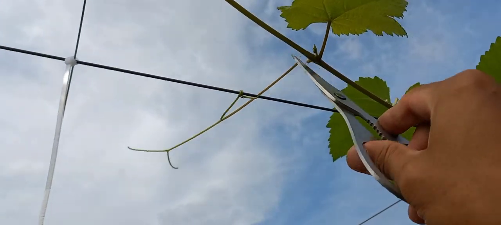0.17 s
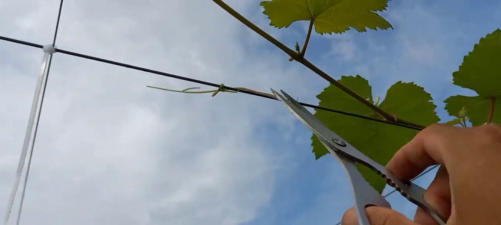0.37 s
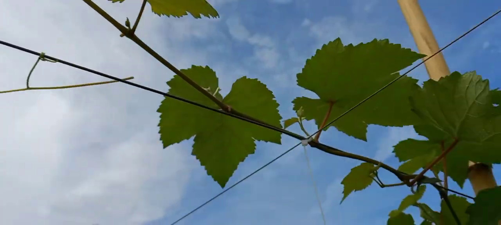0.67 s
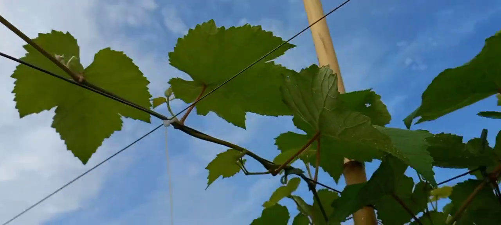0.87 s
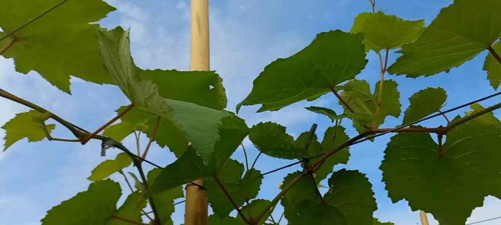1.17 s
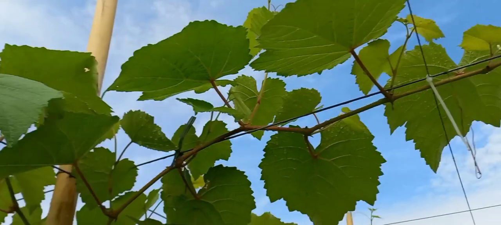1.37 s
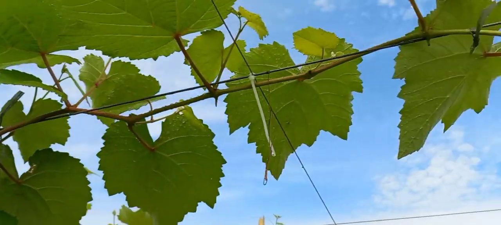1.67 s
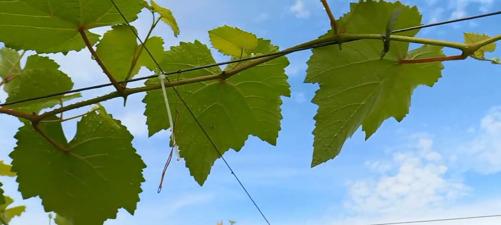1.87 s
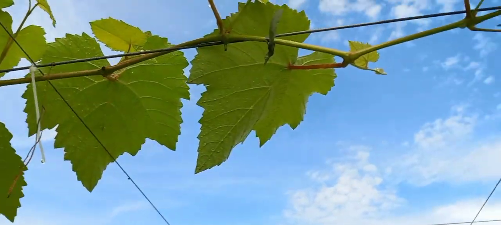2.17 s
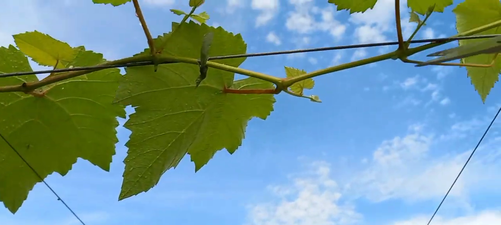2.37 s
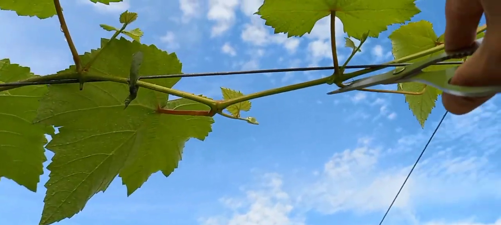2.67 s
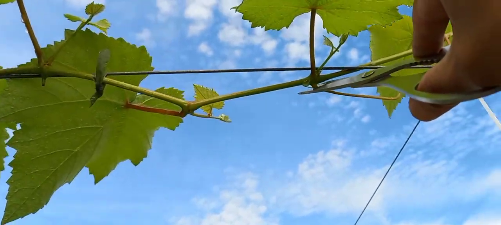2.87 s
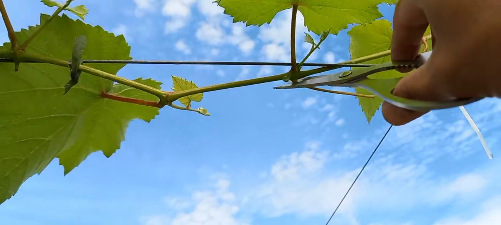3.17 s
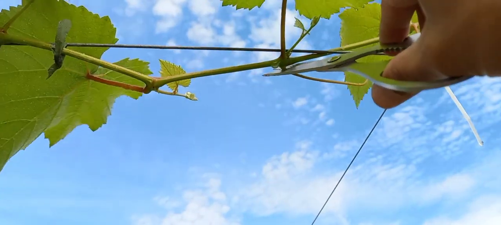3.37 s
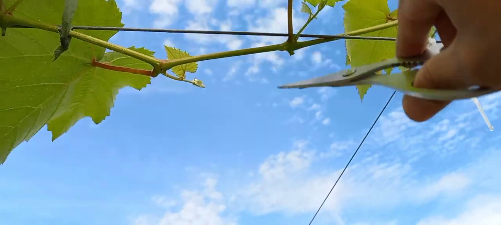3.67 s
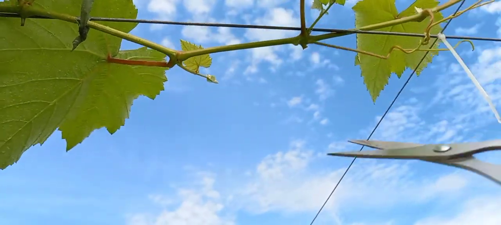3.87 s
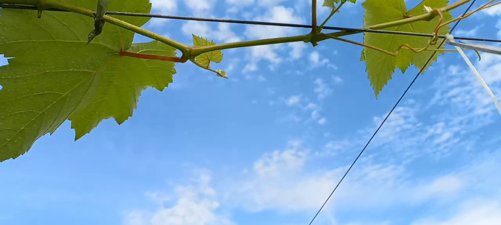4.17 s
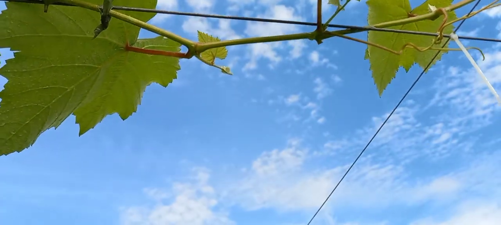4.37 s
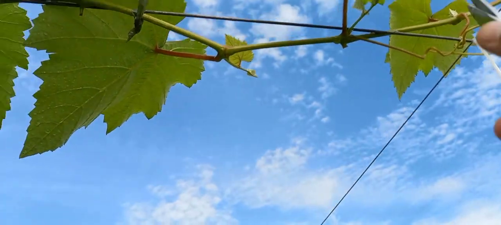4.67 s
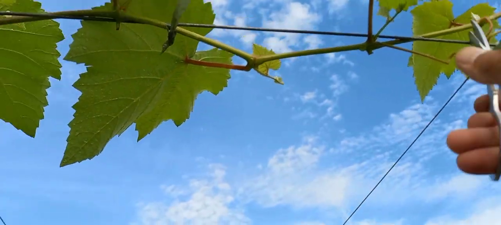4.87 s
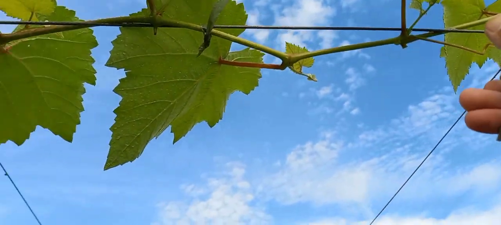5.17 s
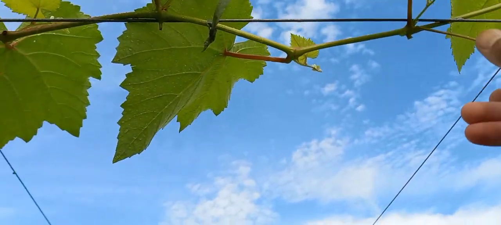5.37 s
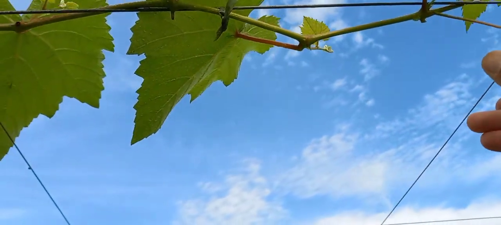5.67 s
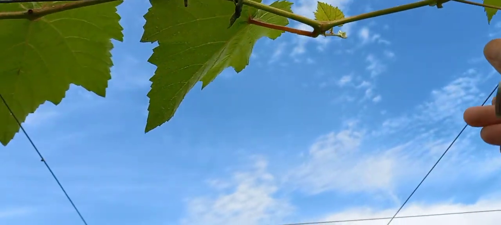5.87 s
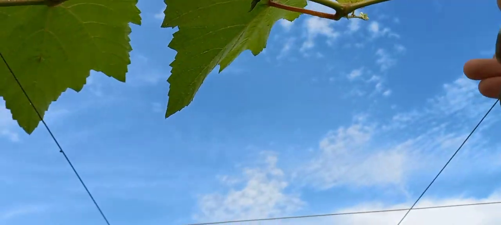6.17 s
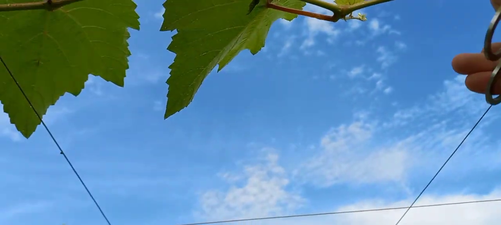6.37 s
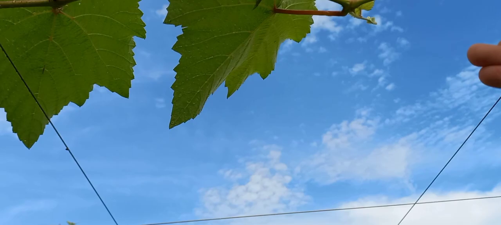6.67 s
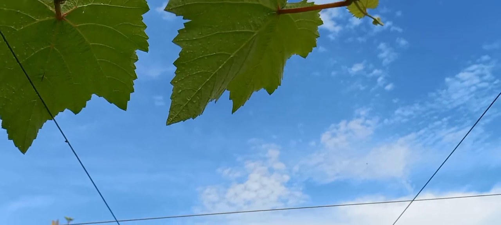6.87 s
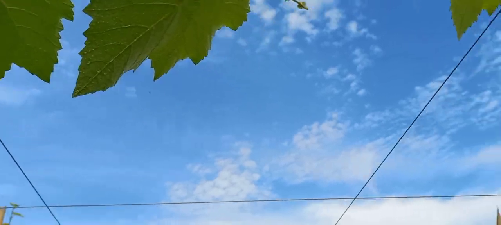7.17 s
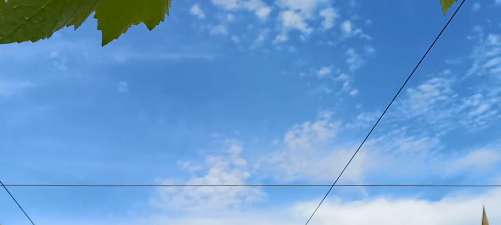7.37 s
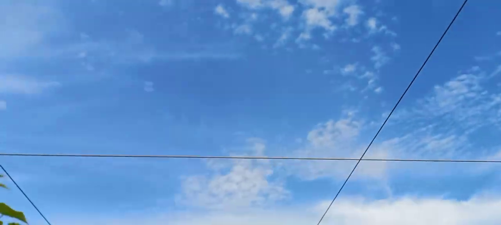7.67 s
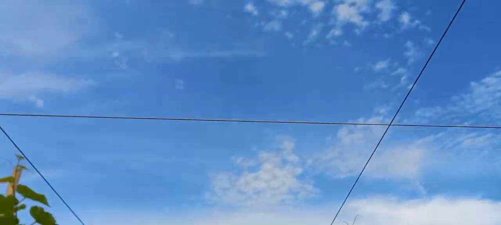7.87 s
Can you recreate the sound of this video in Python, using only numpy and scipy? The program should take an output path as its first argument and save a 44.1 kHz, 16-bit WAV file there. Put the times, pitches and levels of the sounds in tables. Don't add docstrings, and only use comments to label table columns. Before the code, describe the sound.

Small steel pruning shears scrape, snap and crack through vine stems outdoors, over a low machinery throb, rustling leaves, hissing insects and bird chirps.

```python
import sys
import numpy as np
from scipy import signal
from scipy.fft import rfft, irfft, next_fast_len
from scipy.io import wavfile
from scipy.ndimage import uniform_filter1d, map_coordinates

SR = 44100
rng = np.random.default_rng(int(sys.argv[2]) if len(sys.argv) > 2 else 0)


def pcm_store(signal):
    levels = np.round(np.clip(np.atleast_2d(signal), -1, 1) * 32767)
    wavfile.write(sys.argv[1], SR, levels.astype(np.int16).T)


def voltage_ratio(level):
    return 10 ** (np.asarray(level, float) / 20)


N = 353461
SPAN = 8192
TOP_HZ = 15600
MEAN_LOAD_DB, STILL_DB = -60, -85

# time in seconds, level in dB.
MACHINE_LOAD = [(0, -56.5), (.5, -60), (1.3, -58.5), (1.5, -64.5), (2.35, -61), (3.0, -62), (3.25, -55),
                (5.1, -58.5), (5.42, -54.5), (5.6, -57.5), (6.1, -55), (6.6, -58), (8.01, -61)]
# time in seconds, rustle level in dB.
LEAF_STIR = [(0, -86), (.31, -78.5), (.47, -88), (.8, -79.5), (1.45, -82), (1.72, -87.5), (3.5, -86),
             (3.68, -79), (3.86, -88), (4.33, -78), (4.62, -87.5), (4.95, -82), (5.47, -89), (6.49, -85),
             (6.82, -81.5), (7.23, -75), (7.85, -80), (8.01, -72)]
# frequency in Hz, width in Hz, level in dB.
BLADE_RING = [(2220, 300, -27), (3471, 68, -33.5), (3970, 100, -35.5), (4420, 110, -24.5),
              (5530, 100, -17.5), (6860, 360, -14), (7540, 210, -11.5), (8800, 96, -35), (8720, 130, -9.5),
              (9810, 170, -8.5), (11300, 400, 2.5), (12660, 8300, -14), (12200, 120, -4.5),
              (13900, 1300, -2)]
# frequency in Hz, width in Hz, level in dB.
TIP_RING = [(15400, 220, -11)]


def unit(x):
    return x / np.sqrt(np.mean(x ** 2) + 1e-20)


def top(x):
    return x / np.abs(x).max()


def along(points, hz):
    f, v = np.transpose(points)
    return np.interp(np.log(hz + 1), np.log(f + 1), v)


def curves(rows, t):
    s, *cols = np.transpose(rows)
    return [np.interp(t, s, c) for c in cols]


def bumps(rows, width_s, t):
    return sum(db * np.exp(-((t - s) / width_s) ** 2) for s, db in rows)


def wobble(rate):
    knots = rng.standard_normal(int(N * rate / SR) + 4)
    return map_coordinates(knots, [np.arange(N) * rate / SR])


def filtered(x, response):
    m = next_fast_len(x.shape[-1] + SR // 4)
    spectrum = rfft(x, m) * response(np.fft.rfftfreq(m, 1 / SR))
    return irfft(spectrum, m)[..., :x.shape[-1]]


def modes(peaks, lo_hz=0, hi_hz=99999, widen=1, scatter_db=0):
    luck = rng.standard_normal(len(peaks))

    def response(f):
        total = 0
        for k, (centre, width, db) in enumerate(peaks):
            gain = (-1) ** k * voltage_ratio(db + scatter_db * luck[k]) * (lo_hz <= centre < hi_hz)
            damping = 1j * f * width * widen
            total = total + gain * damping / (centre * centre - f * f + damping)
        return total
    return response


def rush(response, patchy_db):
    # frequency in Hz, likeness from -1 to 1.
    likeness = [(60, 1), (180, 0.85), (550, 0.28), (1650, 0.066), (4970, 0.51), (15000, -0.25)]
    z = signal.stft(rng.standard_normal((2, N)), nperseg=512)[2]
    patches = uniform_filter1d(rng.standard_normal(z.shape[1:]), size=6, axis=0)
    patches = uniform_filter1d(patches, size=14, axis=1)
    pair = signal.istft(z * voltage_ratio(patchy_db * unit(patches)), nperseg=512)[1][:, :N]

    def mid_side(hz):
        angle = np.arccos(np.clip(along(likeness, hz), -1, 1)) / 2
        return response(hz) * [np.cos(angle), np.sin(angle)]
    mid, side = filtered(pair, mid_side)
    pair = np.array([mid + side, mid - side])
    return pair / np.std(pair.mean(axis=0))


def far(x, t60, wet_db):
    t = np.arange(SR // 2) / SR
    tail = rng.standard_normal((2, len(t))) * voltage_ratio(-60 * t / t60)
    tail = tail / np.linalg.norm(tail[0])
    return x + voltage_ratio(wet_db) * signal.fftconvolve(x[None], tail, axes=1)[:, :N]


def rumble(t):
    # frequency in Hz, level in dB per Hz.
    throb = [(13, -97.5), (22, -70.5), (37, -27), (76, -4), (92, 2), (109, -1.5), (211, -21.5), (242, -35),
             (260, -44), (340, -62), (570, -120)]
    # time in
    # seconds, change in dB.
    surges = [(.09, -12), (.18, 10), (.33, 9), (0.579, 7.5), (1.43, -5), (1.521, -4), (1.67, 7), (1.83, -3),
              (1.91, 7.5), (2.07, 7), (2.26, 4.5), (2.9, -6.5), (3.52, -10), (3.82, 7.5), (3.96, 2),
              (4.25, 5.5), (4.4, 4), (4.9, -8.5), (4.98, 5.5), (5.38, 3.5), (5.678, -6), (6.16, -10),
              (6.359, -16), (6.49, 4.5), (6.759, 9), (7.02, -5), (7.08, 10), (7.94, 6.5)]
    drone = rush(lambda hz: voltage_ratio(along(throb, hz)), patchy_db=0.0)
    drone /= np.abs(uniform_filter1d(drone.mean(axis=0) ** 2, size=3000)) ** 0.29 + 0.069
    return voltage_ratio(curves(MACHINE_LOAD, t)[0] + bumps(surges, 0.04, t)) * drone


def hum(t, stir_db):
    # frequency in Hz, level in dB per Hz.
    hum_tone = [(120, -22), (200, -5.5), (374, -12), (402, -14.5), (542, -14), (616, -15.5), (1310, -21),
                (1550, -23), (1840, -23.5), (6000, -42), (7800, -56), (13200, -120)]
    # time in seconds, swell in dB.
    breeze = [
        (2.37, 1.4),
        (4.85, 4.8),
        (5.42, 4),
        (5.85, 1.5),
        (6.3, 1.3),
    ]
    load_db = curves(MACHINE_LOAD, t)[0] - MEAN_LOAD_DB
    level_db = -74 + 0.27 * load_db + 0.26 * stir_db + bumps(breeze, 0.057, t)
    return voltage_ratio(level_db) * rush(lambda hz: voltage_ratio(along(hum_tone, hz)), patchy_db=1.6)


def rustle(t):
    # frequency in Hz, level in dB per Hz.
    leaf_tone = [(1760, -28.5), (3000, -12), (3260, -11.5), (3580, -11.5), (4430, -11.5), (6110, -13),
                 (7660, -3.5), (9090, -11.5), (15400, -6.5)]
    noise = rush(lambda hz: voltage_ratio(along(leaf_tone, hz)) * (hz < TOP_HZ), patchy_db=1.2)
    return voltage_ratio(curves(LEAF_STIR, t)[0] + 4.0) * noise


def insects(t, stir_db):
    # frequency in Hz, width in Hz, level in dB.
    wings = [(6770, 1600, -4), (7820, 540, 0.5)]
    # start in seconds, end in seconds, level in dB.
    near_buzz = [
        (2.73, 2.89, -82),
        (4.93, 5.08, -84),
    ]
    pulse = 2 * np.sin(np.pi * 190 * t) ** 2
    buzz = sum(voltage_ratio(db) * (t > start) * (t < end) for start, end, db in near_buzz) * pulse
    drift_db = 0.59 * wobble(74) + 1.5 * np.sin(2.3 * t) * np.sin(6.5 * t + 1)
    chorus = voltage_ratio(-86.5 - 0.69 * stir_db + drift_db)
    return (chorus + buzz) * rush(lambda hz: modes(wings)(hz) ** 2, patchy_db=1.5)


def swish(t):
    # time in seconds, level in dB.
    drag = [(0.17, -72.5), (0.196, -61.5), (0.232, -66), (0.234, -65.5), (0.38, -60.5), (0.46, -71.5),
            (.58, -88)]
    # frequency in Hz, level in dB per Hz.
    shoot_tone = [(180, -21), (300, -5), (689, -1), (978, -3), (1190, 3.5), (1280, -10), (3190, -32),
                  (3520, -30), (4440, -15), (10000, -19), (13500, -6), (16000, -25.5)]
    moving = (t > drag[0][0]) * (t < drag[-1][0])
    return voltage_ratio(curves(drag, t)[0]) * moving * rush(lambda hz: voltage_ratio(along(shoot_tone, hz)), patchy_db=5.0)


def field():
    t = np.arange(N) / SR
    stir_db = curves(LEAF_STIR, t)[0] - STILL_DB

    def from_right(hz):
        later_s = 0.00045
        return voltage_ratio([[-.9], [.9]]) * np.exp(-1j * np.pi * hz * later_s * np.array([[1], [-1]]))
    machinery = filtered(rumble(t) + hum(t, stir_db), from_right)
    return machinery + rustle(t) + swish(t) + insects(t, stir_db)


def hoots():
    # start in seconds, length in seconds, pitch in Hz, level in dB.
    calls = [
        (0, 0.34, 933, -76.5),
        (1.502, 0.4, 1582, -82.5),
        (2.0, 0.21, 1577, -87.5),
        (2.405, 0.36, 1123, -83.5),
        (3.599, 1.68, 1031, -88),
        (4.201, 1.15, 1092, -85),
        (6.285, 0.17, 1890, -80.5),
    ]
    t = np.arange(N) / SR
    notes = 0
    for s, length, hz, db in calls:
        level = voltage_ratio(db + 1.5 * wobble(7))
        swell = np.clip(np.minimum(t - s + .02, s + length - t) / .09, 0, 1)
        notes = notes + level * swell * np.sin(2 * np.pi * hz * t + .95 * wobble(22))
    return far(1.2 * notes, t60=0.16, wet_db=-9)


def add(out, s, sound, pan_db):
    # frequency in Hz, share of
    # the left-right dB.
    shade = [(300, 3.74), (2400, 1.2), (8000, 0.77), (12000, 1.5), (15000, 1.3)]
    # time in seconds, distance in cm.
    extra_way = [(.2, 1.2), (.62, 7), (.7, 7), (.9, 13), (1.1, 15.5), (1.4, 15), (2.6, 1), (4.9, 1),
                 (6.48, 6), (7.0, 11.5), (7.2, 10), (7.6, 8.5)]
    # delay in ms, gain.
    bends = [(.11, -.7), (.27, .65), (.52, .55), (.9, -.4), (1.4, .3)]
    bend_hz = 2500

    def ports(hz):
        ratio = voltage_ratio(pan_db * along(shade, hz))
        spread = (1 + s % .1 * 5) / 1000
        bent = sum(g * np.exp(-2j * np.pi * hz * ms * spread) for ms, g in bends)
        paths = 1 + 1j * hz / (bend_hz + 1j * hz) * bent
        delay = np.exp(-2j * np.pi * hz * curves(extra_way, s)[0] / 34300)
        late = delay * paths / np.sqrt(1 + 1.5 * hz ** 2 / (bend_hz ** 2 + hz ** 2))
        return 2 / np.sqrt(1 + ratio ** 2) * np.array([ratio * late, ratio ** 0])
    start = round(s * SR)
    out[:, start:start + SPAN] += filtered(sound, ports)


def blows(events, peaks, blow_s, widen, woody, woody_hz, grain, fuzz, tail_db, tail_s, thud_db, thud_grows,
          broad=.88, middle_tail=1):
    out, t = np.zeros((2, N + SPAN)), np.arange(SPAN) / SR
    push = np.minimum(t / 0.0009, 1) * np.exp(-(t / blow_s) ** 2 / 2)
    thud = top(filtered(push, modes([(200.3, 160, 0.5), (696, 1400, -5.5)])))
    contact = t == 0
    seat = 0.5 * np.exp(-((t - .0008) * SR) ** 2)
    for s, db, pan_db, middle_db, knock_db in events:
        crack = rfft(rng.standard_normal((3, SPAN)) * push)
        crack = irfft(crack / uniform_filter1d(np.abs(crack), size=60))
        tail = rng.standard_normal((3, SPAN)) * voltage_ratio(tail_db - 60 * t / tail_s) * np.minimum(t / blow_s, 1)
        burst = top(top(crack * np.exp(-t / .004)) + 0.75 * contact + seat)
        burst = burst + tail * [[1], [middle_tail], [middle_tail]]
        high = top(filtered(burst[0], modes(peaks, 10500, widen=widen, scatter_db=2)))
        middle = top(filtered(burst[1], modes(peaks, 3000, 10500, widen=widen, scatter_db=2)))
        clack = filtered(2 * contact + burst[2] + fuzz * tail[0], modes([(5160, 67000, 0)]))
        middle = middle + broad * top(clack)

        def body(hz):
            return modes(woody)(hz) * (1j * hz / (woody_hz + 1j * hz)) ** 3
        knock = top(filtered(contact + grain * burst[0] + fuzz * tail[1], body))
        sound = high + voltage_ratio(middle_db) * middle + voltage_ratio(knock_db - 0.5) * knock
        sound = sound + voltage_ratio(thud_db + (thud_grows - 1) * db) * thud
        add(out, s + 0.0009, voltage_ratio(db) * sound, pan_db)
    return out


def partings():
    # time in seconds, peak in dB, left-right in dB, middle ring in dB, woody knock in dB.
    ticks = [
        (.1545, -36.5, -1, -3.5, -38),
        (2.6694, -73.5, -2, -19, 12),
        (3.486, -65, -1, -7, -33),
        (3.5532, -38.5, 3.5, -15.5, -8.5),
        (4.0087, -75.5, -3, 16, -24.5),
        (4.801, -53.5, 4, 5.5, 2.5),
        (4.806, -58, -1, 4.5, 6),
        (6.467, -52, -4, -2.5, -44),
        (7.0592, -47, 1, -6, 13),
    ]
    # frequency in Hz, width in Hz, level in dB.
    fibres = [(2130, 500, -12), (5390, 370, 0.5), (7420, 480, 9), (9120, 240, -10.5), (9440, 290, -26),
              (12400, 1500, 17.5), (13900, 250, -15), (14100, 270, -31)]
    return blows(ticks, fibres, blow_s=0.0012, widen=1.7, woody=[(903, 700, 5.0), (2335, 690, 0.0)],
                 woody_hz=600, grain=0.22, fuzz=0.55, tail_db=-20.0, tail_s=0.087,
                 thud_db=-36.5, thud_grows=0.43)


def soft_cut():
    # time in seconds, peak in dB, left-right in dB, middle ring in dB, woody knock in dB.
    green_cut = [
        (.1615, -17.5, -2.5, -6.5, -14),
    ]
    # frequency in Hz, width in Hz, level in dB.
    green_ring = [(4200, 230, -16.5), (5380, 99, -13), (6620, 120, -9), (7200, 180, -9.5), (9050, 160, 2),
                  (9920, 91, -11.5), (10200, 110, -20.5), (11020, 150, 1), (11600, 130, -1),
                  (11800, 110, -5), (12400, 170, 0.5), (13100, 150, -1), (14500, 140, -7),
                  (15200, 140, -6.5)]
    return blows(green_cut, green_ring, blow_s=0.0024, widen=1.3, woody=[(1020, 210, -7), (2160, 120, -0.5)],
                 woody_hz=500, grain=0.061, fuzz=0.28, tail_db=-29.5, tail_s=0.09,
                 thud_db=-36.5, thud_grows=0.32)


def snaps():
    # time in seconds, peak in dB, left-right in dB, middle ring in dB, handle knock in dB.
    meetings = [(.2248, -45.5, -5, -6, -22), (.6617, -12, -9, -29, -31), (.9003, -24, -13.5, -12, -19.5),
                (1.0755, -35, -19.5, -4.5, -31), (6.8173, -53.5, -12, 3, -30), (7.062, -23.5, -8, -17, -24),
                (.8588, -40, -14.5, -7, -45), (7.0821, -12, -12, -15.5, -27),
                (7.282, -10.5, -5.5, -25.5, -34.5), (7.465, -44, -6, 9, -45), (7.619, -27, -9.5, -7, -62.5),
                (7.9948, -25, -4.5, -16, -61)]
    return blows(meetings, BLADE_RING + TIP_RING, blow_s=0.0013, widen=1.5,
                 woody=[(2122, 300, 0), (2500, 268, -1.6)], woody_hz=1463, grain=0.073, fuzz=0.11,
                 tail_db=-10.0, tail_s=0.023, thud_db=-59, thud_grows=0.1, broad=.5, middle_tail=.3)


def strokes():
    # start in seconds, length in seconds, first level in dB, last level in dB.
    slips = [(0.602, 0.014, -64, -70), (0.623, 0.014, -36.5, -35.5), (0.64, 0.019, -54, -71.5),
             (0.815, 0.0097, -41, -38), (0.8283, 0.0124, -31.5, -51), (0.836, 0.0077, -50, -39),
             (0.8466, 0.0095, -37, -49), (0.8606, 0.02, -28.5, -71), (1.036, .005, -58, -50),
             (1.0455, 0.011, -40.5, -42.5), (1.053, 0.018, -42, -49), (1.072, 0.022, -47.5, -61),
             (1.279, 0.015, -42.5, -41.5), (1.293, 0.0134, -41, -69.5), (1.376, 0.026, -63.5, -57.5),
             (6.721, 0.014, -42, -44.5), (6.736, 0.023, -46, -52.5), (6.758, 0.037, -51.5, -76),
             (6.845, 0.039, -71, -57), (6.883, 0.0094, -54, -51.5), (7.0045, 0.011, -44.5, -36),
             (7.0154, 0.0051, -42.5, -41.5), (7.02, 0.013, -35, -40), (7.031, 0.029, -33, -62),
             (7.204, 0.0097, -47, -30.5), (7.2102, 0.019, -42, -39), (7.227, 0.013, -47, -46),
             (7.244, 0.006, -40.5, -44.5), (7.247, 0.0093, -39, -33.5), (7.259, 0.011, -40, -54),
             (7.4262, 0.0063, -34.5, -43), (7.432, 0.014, -43, -40.5), (7.448, 0.0084, -42, -58),
             (7.452, 0.032, -39.5, -61), (7.513, 0.043, -59.5, -60), (7.605, 0.027, -51.5, -51),
             (7.81, 0.034, -50, -56), (7.929, 0.0454, -60, -54.5)]
    # time in seconds, left-right in dB, middle ring in dB,
    # body ring in Hz, its extra level in dB.
    grip = [(.603, -11, 12, 2220, -4), (.624, -12, -13.5, 4520, -11), (.815, -11, -17, 4610, -10),
            (1.04, -14.5, -14.5, 4550, 2.5), (1.278, -14.5, -7.5, 2180, 0), (1.382, -25, -8, 5842, 1),
            (6.72, -5.5, -11, 4420, -7), (6.845, -9, -8, 5900, 0.5), (7.005, -14, -9.5, 3270, 3),
            (7.205, -15, -13.5, 4280, -4.5), (7.425, -9, -16.5, 4600, 2.5), (7.6, -6, -4, 4900, -5),
            (7.81, -10, -4, 4500, -9), (7.928, -4.5, -24, 3070, -5)]
    body_base_db, body_grows, firm_db = -62, 0.52, -41.5
    out, t = np.zeros((2, N + SPAN)), np.arange(SPAN) / SR
    catch = 1 + 1.1 * np.exp(-t / .0007)
    onset = np.clip(t / 0.00014, 0, 1)
    for s, length, first_db, last_db in slips:
        pan_db, middle_db, body_hz, extra_db = curves(grip, s)
        mean_db = (first_db + last_db) / 2
        body_db = extra_db + body_base_db + body_grows * (mean_db - firm_db) - mean_db
        force = np.minimum(rng.exponential(size=SPAN // 16), 3.5).repeat(16)
        jolts = rng.standard_normal(SPAN) * voltage_ratio(3.6 * force)
        high = unit(filtered(jolts, modes(BLADE_RING + TIP_RING, 10500, widen=.75, scatter_db=4)))
        middle = unit(filtered(jolts, modes(BLADE_RING, 6000, 10500, widen=.7, scatter_db=4)))
        grit = unit(filtered(jolts, lambda hz: hz ** 2 * (hz < TOP_HZ)))
        body = unit(filtered(jolts, modes([(body_hz, 100, 0), (3800, 5000, -15)])))
        low_ring = unit(filtered(jolts, modes(BLADE_RING, 2000, 6000, widen=1.2, scatter_db=7)))
        body = unit(body + .8 * low_ring)
        edge = unit(high + voltage_ratio(middle_db) * middle + .34 * grit)
        after_db = -60 * np.maximum(t - length, 0) / 0.011
        slide_db = first_db + (last_db - first_db) * np.minimum(t / length, 1)
        level = catch * onset * voltage_ratio(slide_db + after_db)
        add(out, s, level * (edge + voltage_ratio(body_db) * body), pan_db)

    def thin(hz):
        return (1j * hz / (1200 + 1j * hz)) ** 2 / (1 + (hz / TOP_HZ) ** 40)
    return filtered(out, thin)


def firm_snap():
    # time in seconds, peak in dB, left-right in dB, middle ring in dB, handle knock in dB.
    hard_shut = [
        (1.1082, -14, -17.5, -12.5, -18),
    ]
    # frequency in Hz, width in Hz, level in dB.
    pivot_ring = [(4590, 390, -22), (5500, 380, -22.5), (7300, 140, -14.5), (8260, 520, -16),
                  (9710, 290, -17.5), (11840, 250, -4), (12900, 950, -1.5), (14800, 230, -9.5),
                  (15200, 250, -8.5)]
    return blows(hard_shut, pivot_ring, blow_s=0.0012, widen=1.1,
                 woody=[(2170, 440, 0.32), (2430, 465, -1.3)], woody_hz=1460, grain=0.055, fuzz=0.073,
                 tail_db=-21.5, tail_s=0.03, thud_db=-59, thud_grows=0.12, broad=.1, middle_tail=.3)


def thick_cut():
    # time in seconds, peak in dB, left-right in dB, middle ring in dB, woody knock in dB.
    heavy_cut = [
        (3.5611, -12, -2, -13, -16.5),
    ]
    # frequency in Hz, width in Hz, level in dB.
    heavy_ring = [(3870, 220, -21.5), (6700, 115, -13), (7000, 120, -17.5), (8340, 260, -14.5),
                  (9064, 146, -18.5), (9650, 180, -10.5), (10700, 107.6, -20.5), (11200, 128, -16.5),
                  (11900, 72, -10), (11280, 107.3, -4), (13150, 220, 1.5), (12590, 140, 1),
                  (14400, 100, -11), (14870, 130, -17)]
    return blows(heavy_cut, heavy_ring, blow_s=0.0035, widen=3.7,
                 woody=[(796, 820, -5.0), (1940, 320, 2.0), (2540, 93, 0.5)], woody_hz=300, grain=0.21,
                 fuzz=.3, tail_db=-30.5, tail_s=0.13, thud_db=-41.0, thud_grows=0.55)


def twang():
    # time in seconds, peak in dB, left-right in dB, middle ring in dB, woody knock in dB.
    tendril = [
        (6.478, -16.5, -3.5, -5.5, -27),
    ]
    # frequency in Hz, width in Hz, level in dB.
    wire_ring = [(5470, 170, -32), (6300, 130, -24), (7120, 170, -2), (8800, 140, -13), (9130, 170, -4),
                 (10300, 180, -20.5), (11350, 160, -12.5), (11800, 290, -1.5), (12500, 150, -4),
                 (12600, 100, -8), (13400, 170, -11.5), (13900, 240, -3), (14400, 88, -6), (15100, 93, -20)]
    return blows(tendril, wire_ring, blow_s=0.0018, widen=0.94, woody=[(1800, 4300, 0)], woody_hz=300,
                 grain=0.44, fuzz=14, tail_db=-38, tail_s=0.14, thud_db=-40.5, thud_grows=0.12)


def shears():
    cuts = partings() + soft_cut() + thick_cut() + twang()
    near = (cuts + snaps() + strokes() + firm_snap())[:, :N]
    scattered = far(near[1], t60=0.18, wet_db=-39.0) - near[1]
    return near + scattered


def squeals():
    # start in seconds, length in seconds, frequency in Hz, level in dB.
    singing = [(.604, .016, 6750, -71), (0.605, .016, 11350, -67), (0.629, .012, 11300, -44),
               (.826, .012, 13900, -39), (0.85, .009, 13900, -47), (1.283, .022, 2170, -77),
               (6.74, .02, 10000, -45), (6.74, .024, 11350, -46.5), (6.738, .02, 12200, -45.5),
               (6.72, 0.021, 5550, -64), (6.826, .016, 11300, -71), (6.856, .013, 15300, -45.5),
               (6.865, .014, 6600, -65), (6.867, 0.019, 15300, -64), (7.025, 0.042, 3260, -61),
               (7.02, .012, 6800, -48), (7.027, 0.015, 8800, -47), (7.422, 0.02, 11350, -50),
               (7.53, .02, 13900, -66), (7.596, .014, 15200, -47), (7.808, .032, 4870, -67),
               (7.807, .025, 13700, -50), (7.93, .035, 12200, -60), (7.957, .014, 15400, -51)]
    out, t = np.zeros((2, N + SPAN)), np.arange(SPAN) / SR
    for s, length, hz, db in singing:
        ring = modes([(hz, 93, 0)])
        tone = unit(filtered(rng.standard_normal(SPAN), lambda f: ring(f) ** 2))
        swell = np.abs(np.sin(np.pi * np.minimum(t / length, 1))) ** .6
        add(out, s, voltage_ratio(db) * swell * tone, pan_db=-10.5)
    return out[:, :N]


def whistles(notes, trill_hz, flick, soft=0.55, late=1):
    out = np.zeros(N + SR)
    for s, length, first_hz, last_hz, db, trill in notes:
        t = np.arange(int(length * SR)) / SR
        beat = (t * trill_hz) % 1
        hz = (first_hz + (last_hz - first_hz) * t / length) * (1 + flick * trill * (2 * beat - 1))
        swell = np.sin(np.pi * (t / length) ** late) ** soft
        chop = 1 - np.clip(trill, 0, 1) * (1 - np.sin(np.pi * beat) ** 6)
        flick_db = 2.9 * rng.standard_normal(20)[(t * trill_hz).astype(int)]
        tone = np.sin(2 * np.pi * np.cumsum(hz) / SR)
        out[round(s * SR):][:len(t)] += 1.41 * voltage_ratio(db + flick_db) * swell * chop * tone
    return out[:N]


def chopped(rows, depth):
    return [(*row, depth) for row in rows]


def far_bird(trill_depth, chirp_depth):
    # start in seconds, trill length in seconds, first pitch in Hz, trill level in dB, note level in dB.
    phrases = [
        (2.604, 0.094, 4000, -73, -76),
        (3.044, 0.15, 4935, -72.5, -71.5),
        (3.577, .11, 4358, -65, -70.5),
    ]
    # start in seconds, length in seconds, first pitch in Hz, last pitch in Hz, level in dB.
    far_trills = [
        (2.615, 0.068, 4130, 4770, -77),
        (3.096, 0.098, 3880, 4050, -78.5),
        (3.394, 0.07, 4100, 4400, -83),
    ]
    pause_s, note_s, note_hz = .05, 0.024, 2650
    falls = [(s, length, hz, 2670, db) for s, length, hz, db, _ in phrases]
    held = [(s + length + pause_s, note_s, note_hz, note_hz - 40, db, chirp_depth)
            for s, length, _, _, db in phrases]
    held += [(s + 0.043, length, a, b, db - 5.5, depth) for s, length, a, b, db, depth in held]
    song = chopped(falls + far_trills, trill_depth) + held
    return far(whistles(song, trill_hz=62.7, flick=0.18, soft=.8, late=1.3), t60=0.4, wet_db=3)


def near_birds(trill_depth, chirp_depth):
    # start in seconds, length in seconds, first pitch in Hz, last pitch in Hz, level in dB.
    trills = [
        (4.215, 0.098, 3430, 3930, -66.5),
        (4.265, 0.05, 3870, 3720, -63),
        (5.56, 0.088, 3130, 4120, -54.5),
    ]
    dropping = [
        (4.597, 0.085, 3450, 4080, -66.5),
        (4.662, 0.041, 3440, 3050, -54.5),
        (4.692, .048, 3070, 4100, -56),
    ]
    chirps = [(4.004, 0.048, 3080, 2700, -78.5), (4.188, 0.014, 2500, 2540, -77.5),
              (4.563, 0.023, 2650, 2290, -62), (4.32, .022, 4600, 4400, -80),
              (4.683, 0.022, 2800, 1800, -79), (4.337, .026, 1740, 2220, -81),
              (4.786, 0.043, 2040, 2950, -69.5), (5.205, 0.013, 3290, 4010, -65),
              (5.473, 0.012, 3160, 2770, -71), (5.483, 0.015, 2640, 2570, -68.5),
              (5.639, 0.013, 4400, 4640, -68.5), (5.689, 0.03, 1980, 3050, -67.5),
              (5.79, 0.018, 3950, 3900, -80.5), (5.815, .016, 3720, 4000, -75),
              (5.845, 0.013, 2950, 3330, -78), (5.855, .016, 3340, 3000, -76),
              (5.95, 0.0099, 3950, 4100, -80.5), (5.974, 0.017, 3980, 3780, -75),
              (6.008, .015, 2730, 3220, -81), (6.017, .014, 3270, 3030, -74),
              (6.122, 0.02, 3800, 3760, -77), (6.144, 0.018, 3760, 3840, -70),
              (6.18, .022, 3170, 2880, -76), (7.655, 0.017, 3310, 3100, -71.5),
              (7.669, 0.017, 3120, 3560, -67), (7.937, 0.02, 3530, 2980, -64),
              (7.949, 0.012, 3070, 3400, -60)]
    rising = whistles(chopped(trills, trill_depth) + chopped(chirps, chirp_depth), trill_hz=64, flick=.085)
    falling = whistles(chopped(dropping, trill_depth), trill_hz=65, flick=-.07)
    return far(rising + falling, t60=.45, wet_db=-4.5)


def birds():
    # start in seconds, length in seconds, first pitch in Hz, last pitch in Hz,
    # level in dB, chop depth (0-1).
    click = [
        (3.088, .02, 10400, 10200, -62, 0.0042),
    ]
    depths = 0.925, .15
    song = far_bird(*depths) + near_birds(*depths)
    return song * voltage_ratio([[1.1], [-1.1]]) + whistles(click, trill_hz=0, flick=0)


def scene():
    return field() + hoots() + shears() + squeals() + birds()


def top_cut(x):
    return signal.sosfilt(signal.butter(12, 16820, fs=SR, output="sos"), x)


def record(dry):
    kept = filtered(dry, lambda hz: voltage_ratio(-16 * np.clip((hz - TOP_HZ + 150) / 300, 0, 1)))
    return top_cut(kept)


dry = scene()
out = record(dry)
pcm_store(out)
```